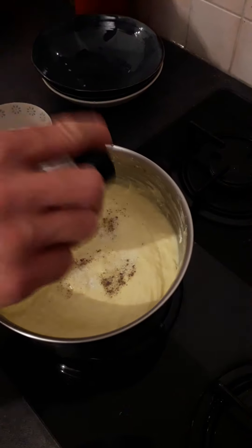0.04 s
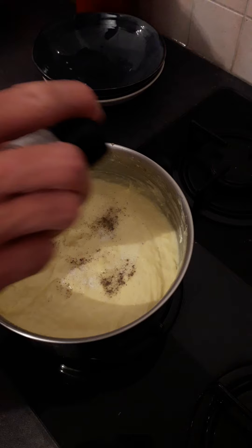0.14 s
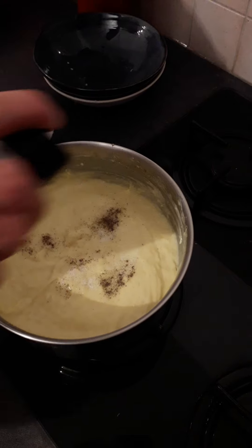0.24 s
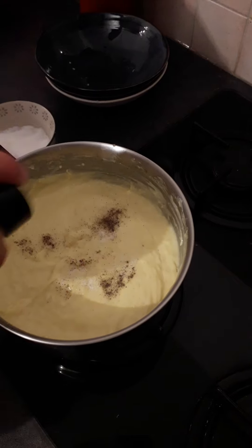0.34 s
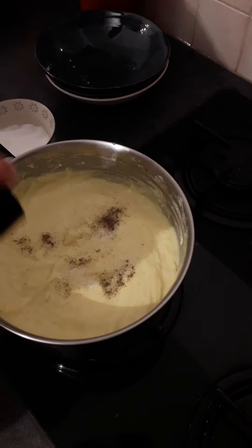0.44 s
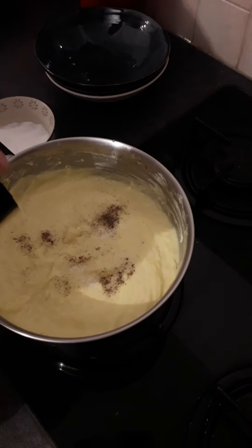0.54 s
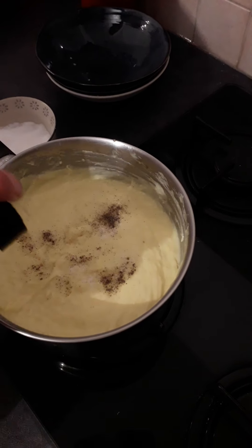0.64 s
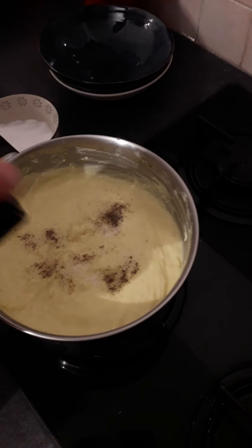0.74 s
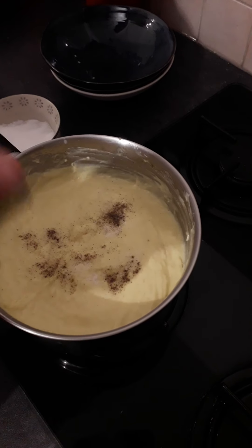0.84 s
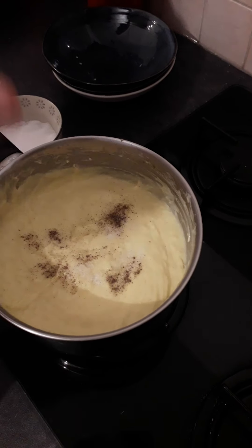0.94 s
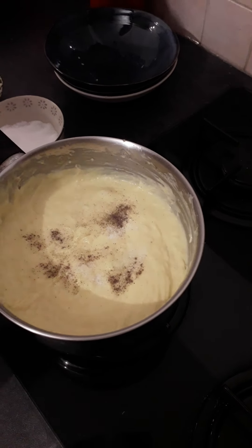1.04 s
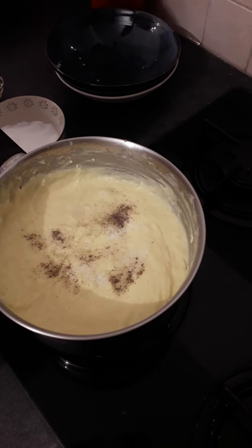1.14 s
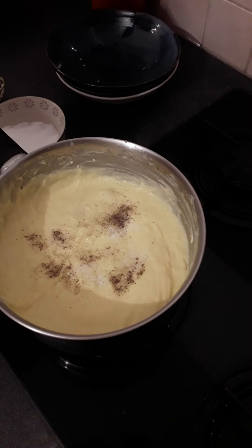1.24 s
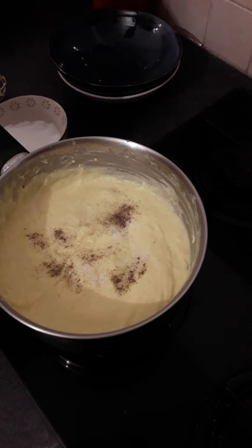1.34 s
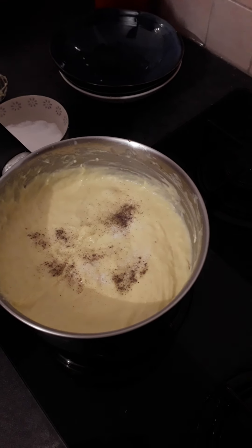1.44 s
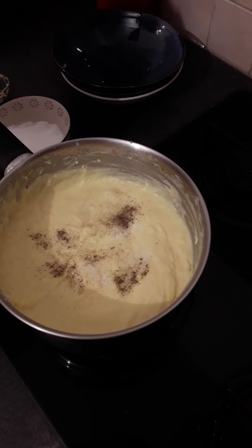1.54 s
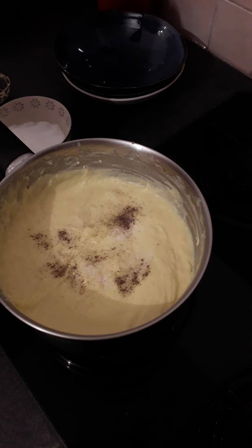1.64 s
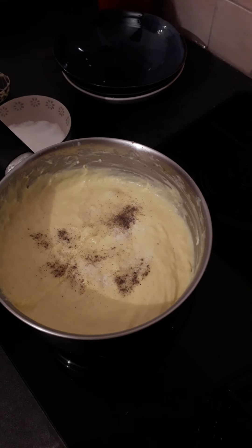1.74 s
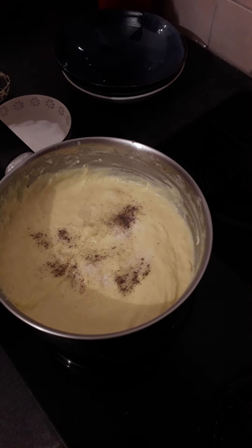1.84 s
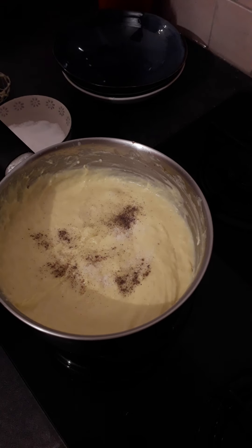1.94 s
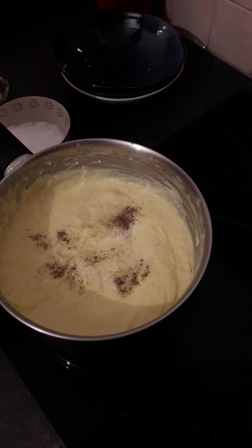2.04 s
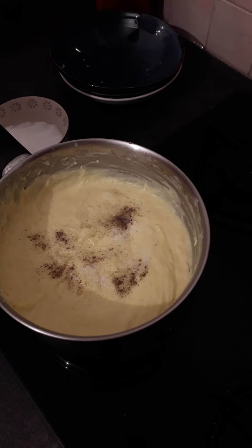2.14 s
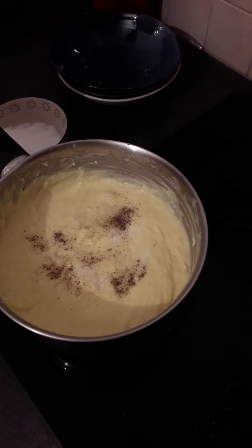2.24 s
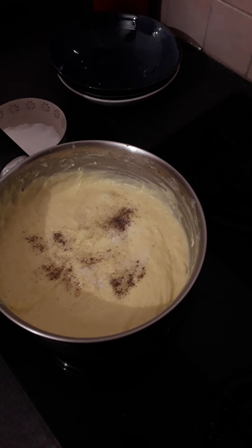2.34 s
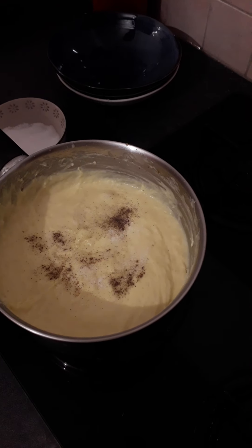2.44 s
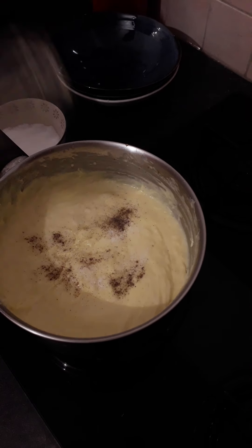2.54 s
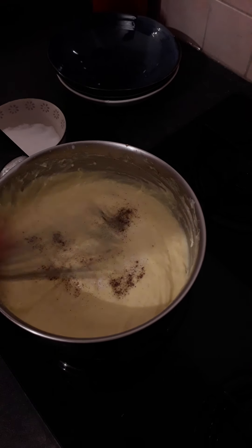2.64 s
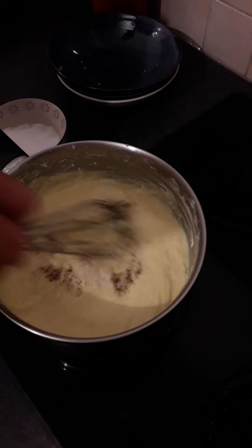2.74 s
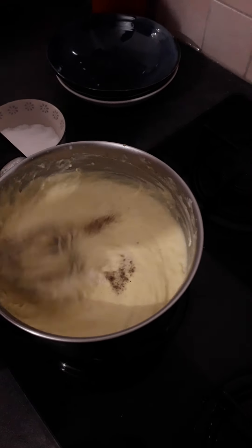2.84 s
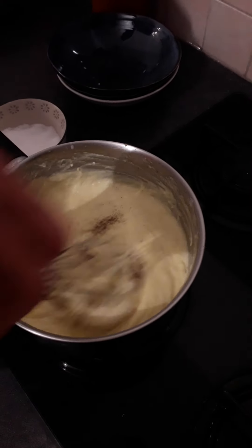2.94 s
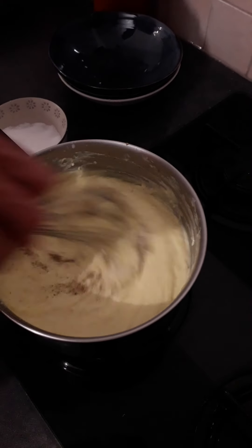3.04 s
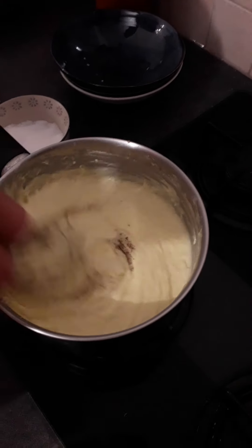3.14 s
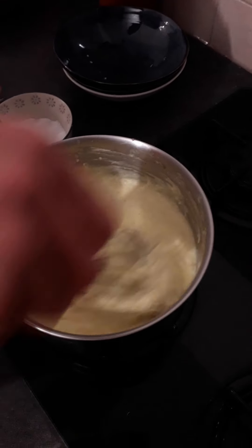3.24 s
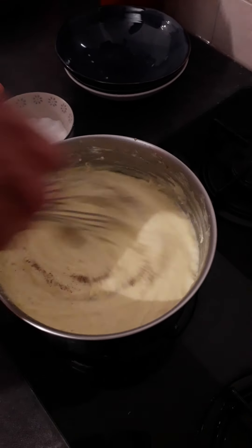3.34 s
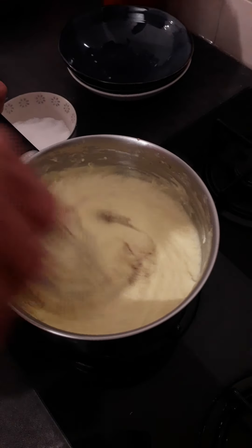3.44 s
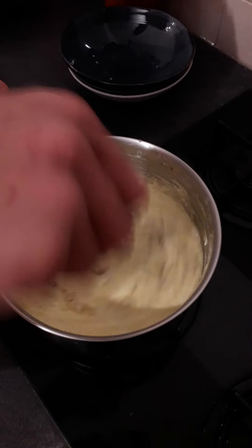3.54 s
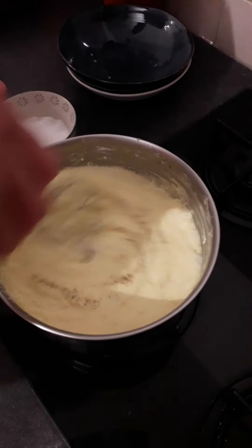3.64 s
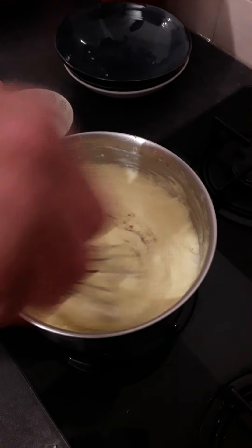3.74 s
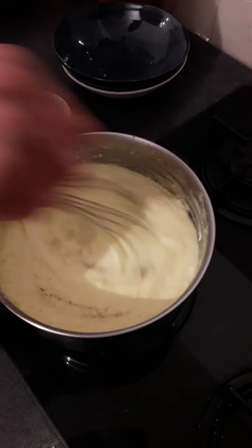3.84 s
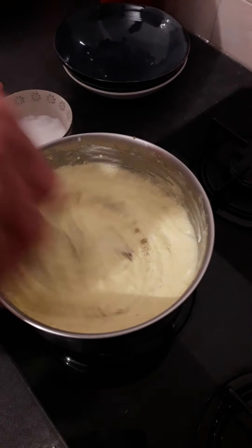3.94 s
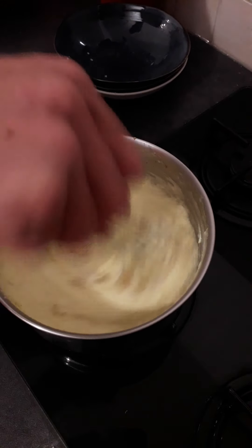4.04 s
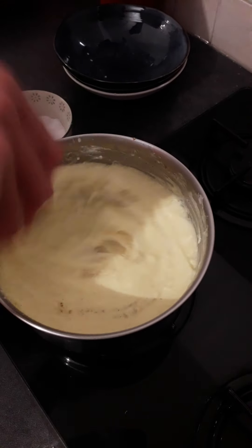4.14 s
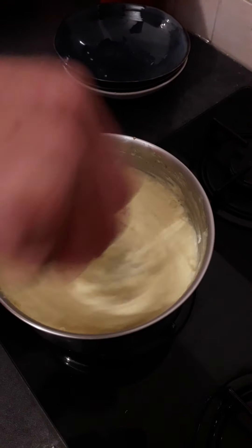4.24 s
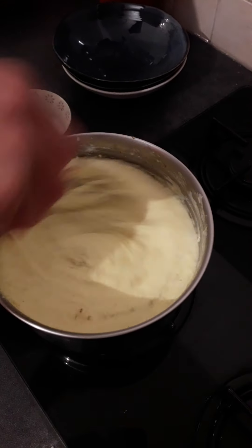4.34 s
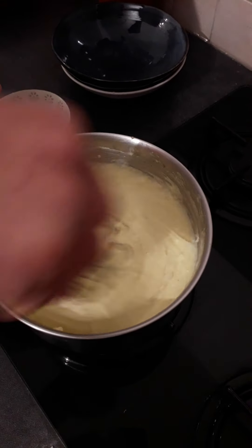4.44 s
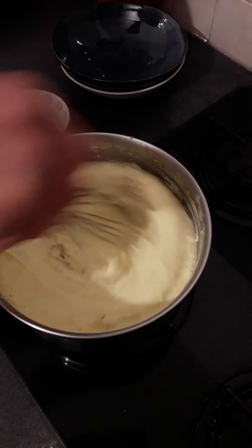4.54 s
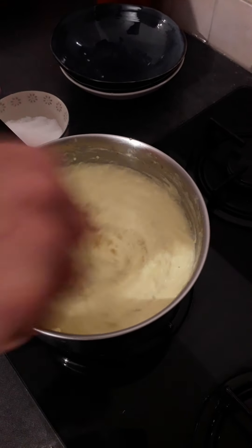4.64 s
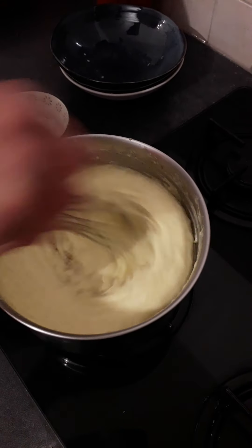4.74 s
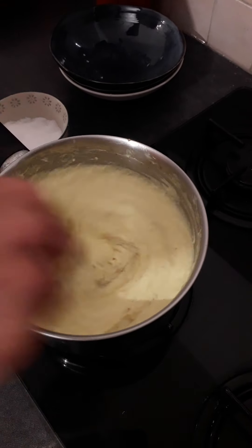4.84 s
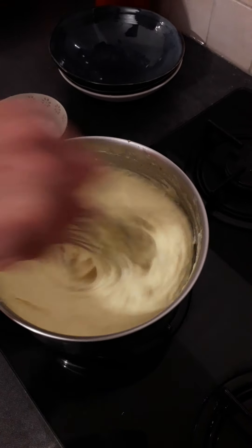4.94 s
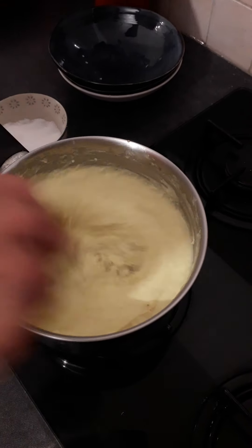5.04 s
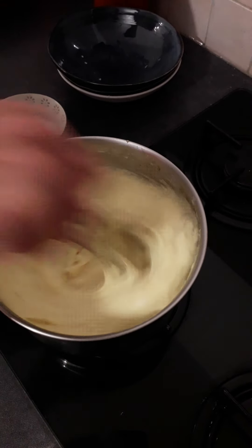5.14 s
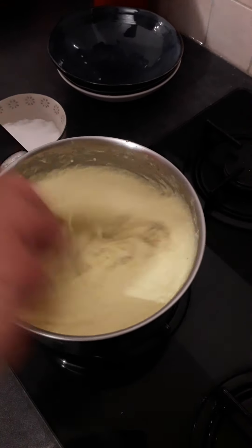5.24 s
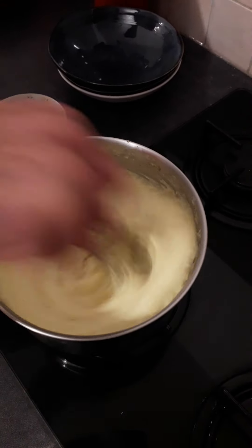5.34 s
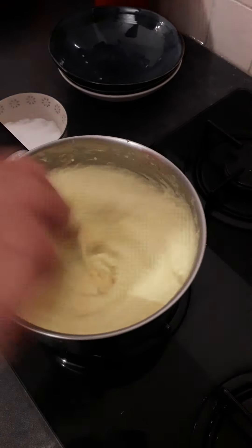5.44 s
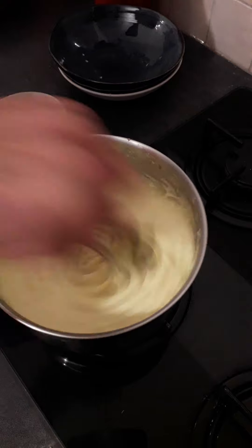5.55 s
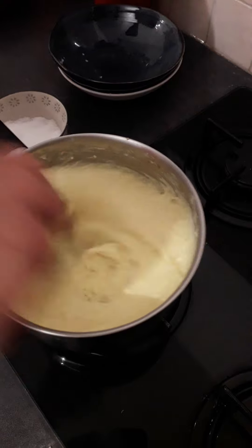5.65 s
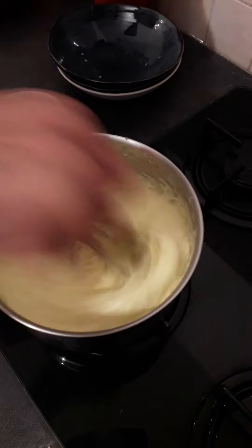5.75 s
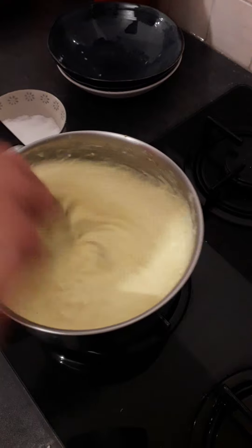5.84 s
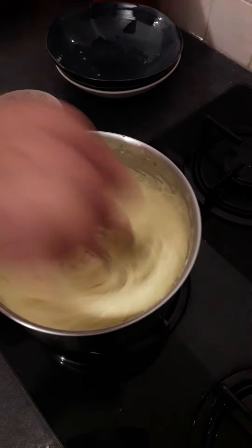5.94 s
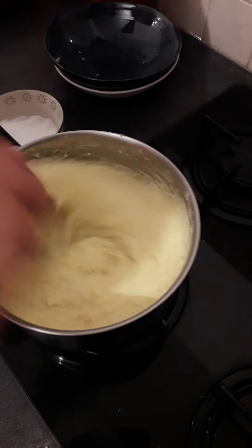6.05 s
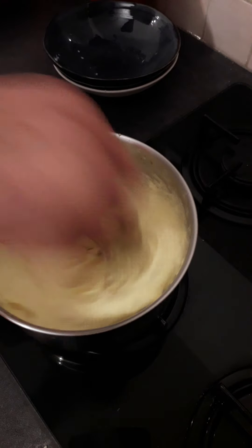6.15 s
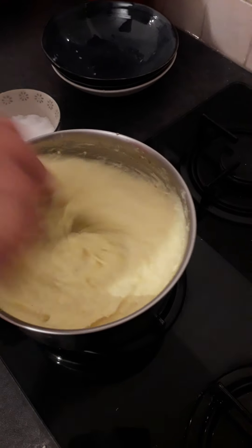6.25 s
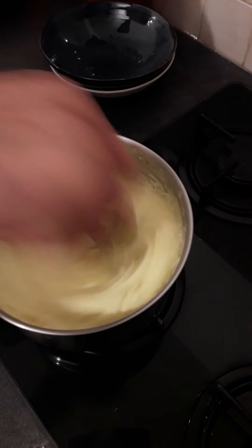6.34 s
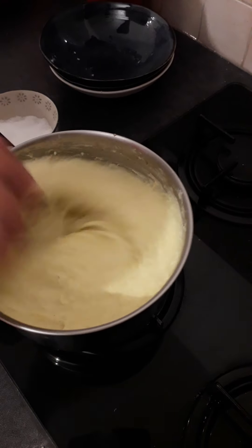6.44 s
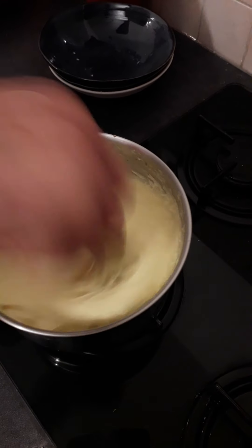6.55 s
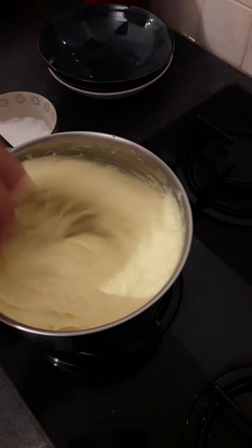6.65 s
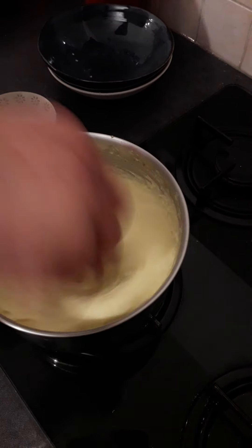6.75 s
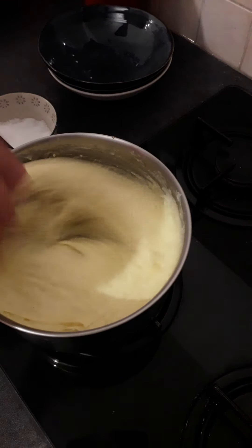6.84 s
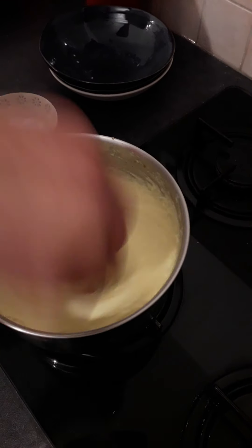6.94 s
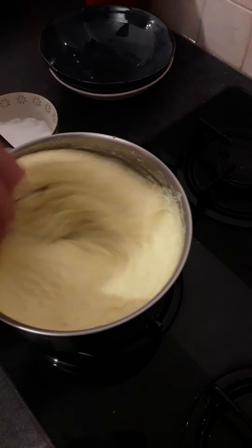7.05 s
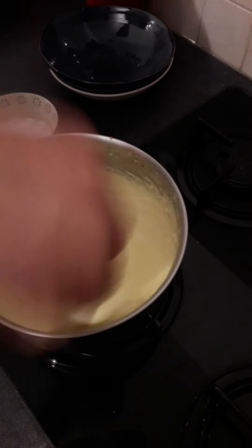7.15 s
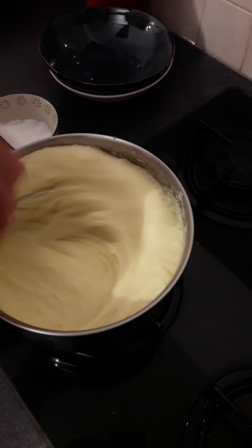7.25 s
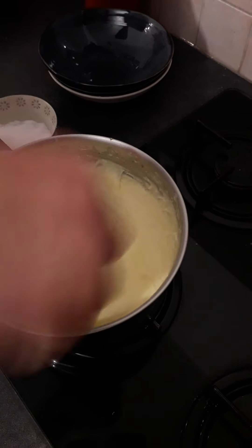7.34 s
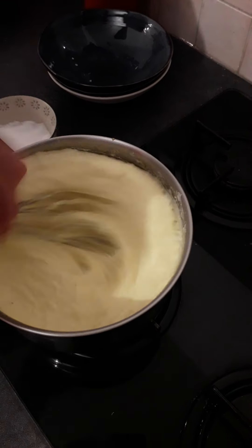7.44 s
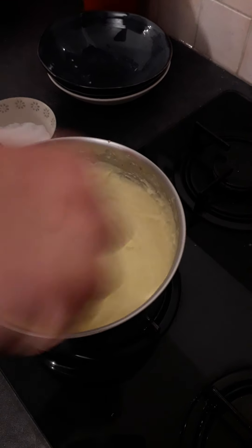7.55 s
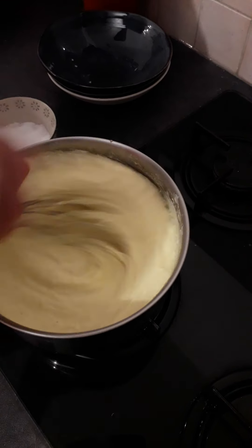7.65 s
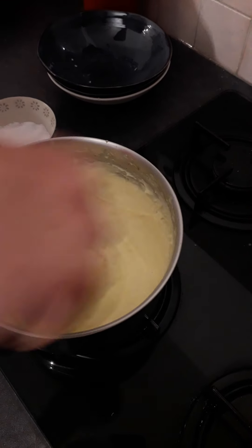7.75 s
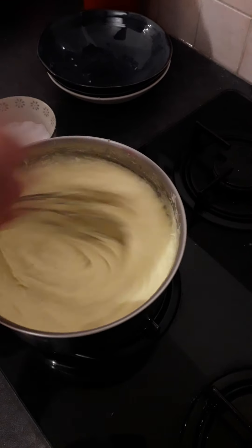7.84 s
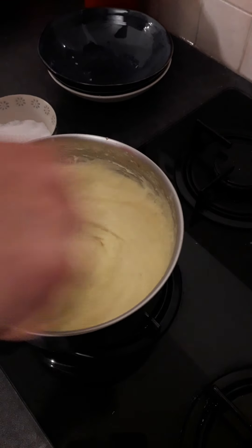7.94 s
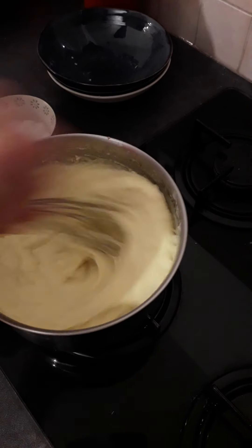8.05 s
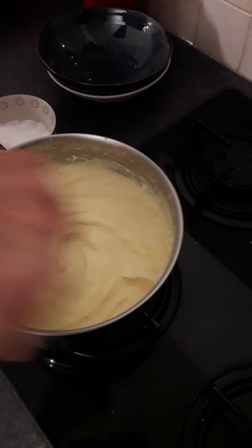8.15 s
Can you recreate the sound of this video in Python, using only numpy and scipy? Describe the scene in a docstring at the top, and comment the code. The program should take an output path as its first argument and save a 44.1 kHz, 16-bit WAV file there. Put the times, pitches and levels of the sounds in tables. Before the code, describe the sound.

After a click and a cupboard bang, a whisk bumps, scrapes and squeaks around a steel pan, churning thick sauce.

```python
"""A faint kitchen hum. Fingers rub and tick on a spice jar, a cupboard catch clicks and the wooden
door bangs shut. A wire whisk sinks into thick sauce, squeaks on a steel saucepan and bumps its floor;
the glass hob booms below. The whisk gathers speed and circles nearly five times a second. Each turn
clacks on the wall and scrapes twice as the wires stick and slip, while the sauce churns in wet pops."""
import sys
import numpy as np
from scipy import signal
from scipy.fft import rfft, irfft
from scipy.io import wavfile
from scipy.ndimage import uniform_filter1d, minimum_filter1d

SR = 44100
rng = np.random.default_rng(int(sys.argv[2]) if len(sys.argv) > 2 else 0)


def unload_wav(signal):
    """Save mono or channel-first audio to the path in sys.argv[1] as 16-bit WAV at rate SR, clipped to [-1, 1]."""
    wavfile.write(
        sys.argv[1],
        SR,
        np.round(np.clip(np.atleast_2d(signal).T, -1, 1) * 32767).astype(np.int16),
    )


N = 361179
TIME_S = np.arange(N) / SR

# Level curves. Each row: time in seconds, relative level in dB.
HUM_NOISE_CURVE = [(0, -66.5), (1.5, -65), (1.8, -64.5), (2.6, -70), (3.2, -61.5), (8.19, -61)]
SWISH_CURVE = [(2.6, -76), (2.728, -67), (2.862, -68.5), (3.532, -69.5), (3.908, -69), (4.392, -71),
               (4.45, -56)]  # wires cutting slowly through the sauce
CHURN_CURVE = [(4.3, -54), (4.6, -46), (4.85, -47.5), (5.25, -42), (5.65, -38.5), (6.25, -44),
               (6.75, -39.5), (7.6, -38.5), (8.19, -35)]  # how hard the sauce is stirred

# Spectra. Each row: frequency in Hz, relative spectral density in dB.
HUM_SPECTRUM = [(25, -10), (50, -4), (75, -11.5), (100, 8), (200, -8.5), (320, -0.5), (430, -3.5),
                (550, -0.5), (750, -10.5), (1200, -19.5), (3000, -23.5), (7000, -18.5), (9000, -31),
                (12000, -24.5), (16000, -26.5)]
FINGER_SPECTRUM = [(710, -48), (1200, -21), (2300, -18.5), (3740, 0), (5530, 0), (7330, -1), (9210, -25),
                   (11300, -14.5), (16000, -23.5)]
CATCH_SPECTRUM = [(60, -34), (200, -13), (900, -9), (1700, -2), (2500, -2.5), (3600, 3.5), (4800, -7.5),
                  (7200, -4), (9000, -21.5), (11500, -11.5), (16000, -26.5)]
DOOR_SPECTRUM = [(30, -50.5), (80, -36.5), (130, -9.5), (300, -3), (450, -7), (650, -0.5), (1250, 3),
                 (1700, -6.5), (2400, -16.5), (3500, -13.5), (5000, -23), (7500, -26), (9500, -42.5),
                 (11800, -36), (15000, -56.5)]
SWISH_SPECTRUM = [(1000, -25), (1700, -20), (2400, -20), (3200, -1), (4200, 2), (5600, -1), (7400, 6.5),
                  (8300, -7.5), (9300, -16), (11500, -3.5), (16000, -18)]
POP_SPECTRUM = [(50, -15.5), (90, 3), (170, 11), (260, 0.5), (400, 4), (560, 4), (800, 0), (1100, -1.5),
                (1800, -3.5), (2600, -11.5), (6000, -50)]
THUD_SPECTRUM = [(40, -35), (100, 7), (250, 1), (450, -11.5), (700, 3.5), (1000, -11), (1700, -5.5),
                 (2300, -19.5), (3500, -15), (8000, -61), (16000, -56)]  # struck pan
PING_SPECTRUM = [(800, -36), (2500, 10), (4000, 9), (5900, 11), (7200, -5), (9000, -19), (12000, -25),
                 (16000, -22)]  # struck wires
HOB_SPECTRUM = [(40, -39.5), (70, -25.5), (100, 5), (170, -11), (240, -10), (400, -3.5), (1000, -19.5),
                (4000, -76)]
CLACK_SPECTRUM = [(600, -17.5), (1300, 0.5), (2000, -4.5), (2700, -16), (3700, -7.5), (5000, -22),
                  (7000, -17), (9000, -34), (16000, -37)]  # wire on the pan wall
SCRAPE_SPECTRUM = [(300, -8), (1000, -23), (2000, -1.5), (2600, -9.5), (3200, -3), (4800, -1.5), (5600, 2),
                   (6200, 0), (7100, -1), (8000, -7.5), (9000, -21.5), (16000, -63)]
FIZZ_SPECTRUM = [(4000, -43), (8000, -0.5), (9000, -7), (10500, 2), (11700, 5), (13000, -6), (16000, -6.5)]  # fine spray above the scrape

# Resonances. Each row: frequency in Hz, relative level in dB, T60 in seconds.
JAR_MODES = [(1500, -4, .03), (2080, -1, .03), (2550, -3, .025), (3100, -3, .02), (3620, -1, .02),
             (4250, -1, .02), (5300, 1, .02)]
CATCH_MODES = [(1870, -3, 0.033), (2090, -3.5, .06), (3560, -0.5, 0.033), (3710, 2, 0.041),
               (4250, -8, 0.044), (6700, -4.5, .03)]
DOOR_MODES = [(178, -21, .5), (332.4, -11, 0.86), (542, -1.5, .36), (670, -4, 0.41), (762, 1, 0.44),
              (937, -9.5, .4), (1050, -9, 0.21), (1134, -0.5, .34), (1240, 0, 0.11), (1335, -5, 0.38),
              (1494, -16, .4)]
SPRING_MODES = [(2870, 2.5, .3), (3460, -2.5, .3), (3860, 0, .3), (11460, -5, .2), (11900, -9.5, .18)]  # spring of the catch
HOB_MODES = [(100, 0, .4), (138, -3, .25), (163, 1, .3), (195, -4, .2), (263, -7, .18)]
PAN_MODES = [(545, 0, .11), (610, -5, .08), (765, -6, .09), (918, -11, .08), (1255, -6, .08),
             (1660, -3, .13), (1900, -7, .08), (2050, -10, .06)]  # damped by the sauce
WIRE_MODES = [(2990, 4.5, 0.036), (4400, -14, 0.037), (5400, 4.5, 0.016)]

# Appliance tones. Each row: frequency in Hz, level in dB.
HUM_TONES = [(49, -77.5), (99, -75.5), (296, -71.5), (544, -68)]
# Fingers on the jar. Each row: start in seconds, length in seconds, relative level in dB,
# offset of the glass ring in dB.
JAR_RUBS = [(0.134, .21, -61.5, -6), (0.826, .045, -56, -21), (1.208, .1, -53.5, -18)]
# Light ticks of the jar. Each row: start in seconds, relative level in dB.
JAR_TICKS = [(0.4714, -45), (0.8766, -40.5), (1.9747, -45)]
# Door hitting its frame, then rebounding. Each row: start in seconds, relative level in dB,
# rattle cutoff in Hz.
DOOR_BLOWS = [(1.617, 0, 18000), (1.832, -16, 3000)]
# Wire squeaks. Each row: centre in seconds, width in seconds, pitch in Hz, relative level in dB.
WIRE_SQUEAKS = [(3.014, .071, 1946, -60), (3.028, .06, 546, -49.5), (5.308, .053, 5400, -28.5),
                (5.486, .04, 7050, -32), (5.522, 0.036, 534, -26.5), (5.634, .055, 1912, -28.5),
                (5.727, .053, 542.6, -36), (5.945, 0.083, 544, -32), (6.02, .076, 1950, -34),
                (6.388, .02, 5330, -24), (6.54, .035, 589, -38), (6.738, .025, 5560, -25),
                (7.081, .09, 1900, -38), (7.44, .04, 513, -34), (7.49, 0.031, 1904, -27.5),
                (7.664, 0.055, 2050, -33.5)]
# Whisk on the pan floor. Each row: start in seconds, relative level in dB, hob offset in dB,
# wire offset in dB.
FLOOR_BUMPS = [(3.26, -25, -9, -17), (3.474, -36.5, -4, -47), (3.746, -38.5, -3, -52),
               (3.981, -38, -2, -45), (4.112, -25, -15, -17), (4.352, -18.5, -26, -12),
               (4.583, -19.5, -14.5, -6.5), (4.788, -18.5, -14.5, -8), (4.864, -21.5, -10, -10),
               (4.992, -22, -14, -12), (5.55, -32.5, -23, 0), (6.497, -19, -12.5, -7.5),
               (6.827, -32.5, -8, -7), (7.939, -24, -37, -4.5)]
# Whisk turns. Each row: start in seconds, relative clack level in dB, hob offset in dB,
# push delay in seconds, relative push level in dB, relative back-sweep level in dB.
WHISK_TURNS = [(4.305, -37, 1, 0.072, -65, -47), (4.533, -29, -8, 0.08, -39.5, -49),
               (4.731, -28.5, -12, 0.04, -38, -34.5), (4.935, -28, -14, 0.059, -31.5, -32.5),
               (5.12, -20, -17.5, 0.067, -28.5, -32.5), (5.317, -21, -15.5, 0.078, -28, -34.5),
               (5.5198, -28, -21, .077, -27.5, -34.5), (5.731, -46, 1, 0.073, -28.5, -34),
               (5.9488, -21.5, -22, 0.053, -28, -31), (6.1588, -23.5, -10.5, 0.05, -29.5, -32),
               (6.354, -21.5, -9, 0.059, -28.5, -29.5), (6.56, -21.5, -9, 0.056, -27, -31),
               (6.7679, -20.5, -22, 0.053, -26, -32), (6.983, -23, -16, 0.051, -27, -32),
               (7.2005, -21.5, -9, 0.047, -31.5, -31.5), (7.3911, -23.5, -9, 0.055, -27, -32.5),
               (7.6011, -30, -20, 0.054, -28, -30.5), (7.8186, -24, -17, 0.05, -30, -31),
               (8.017, -26, -29, 0.058, -26.5, -30)]
# Singing wires. Each row: pitch in Hz, scatter in Hz.
WIRE_PITCHES = [(4600, 277), (5400, 113), (5600, 124), (5750, 413), (6400, 297), (7100, 173)]
FIZZ_PITCHES = [(10700, 3300), (11700, 1500), (13500, 1000)]
# Kitchen reverberation. Each row: frequency in Hz, T60 in seconds.
ROOM_DECAY = [(100, .7), (300, 0.72), (1000, 0.54), (2000, 0.48), (5000, 0.47), (8000, 0.32), (13000, 0.38)]


def amp(db):
    """Decibels to gain."""
    return 10 ** (np.asarray(db) / 20)


def unit(x):
    """Scale to rms 1."""
    return x / np.sqrt(np.mean(x ** 2) + 1e-20)


def lookup(rows, hz):
    """Interpolate a table over log frequency."""
    row_hz, value = np.transpose(rows)
    return np.interp(np.log(hz + 1), np.log(row_hz + 1), value)


def envelope(curve):
    """Level curve as gain, silent outside its span."""
    time_s, db = np.transpose(curve)
    return amp(np.interp(TIME_S, time_s, db, left=-200, right=-200))


def add(mix, start_s, sound):
    """Mix a sound in place."""
    part = mix[max(round(start_s * SR), 0):][:len(sound)]
    part += sound[:len(part)]


def through(x, response):
    """Convolve with the response scaled to energy 1; keep the input length."""
    return signal.oaconvolve(x, response / np.linalg.norm(response))[:len(x)]


def colour(x, spectrum, size=4096):
    """Minimum-phase filter with the shape of the spectrum."""
    log_gain = np.log(amp(lookup(spectrum, abs(np.fft.fftfreq(size, 1 / SR)))))
    response = np.fft.ifft(np.exp(np.conj(signal.hilbert(log_gain)))).real
    return through(x, response[:size // 2])


def ring(x, modes):
    """Drive damped modes; little radiates below the lowest."""
    t = TIME_S[:SR]
    response = sum(amp(db - 60 * t / t60_s) * np.sin(2 * np.pi * hz * t) * rng.choice([-1, 1])
                   for hz, db, t60_s in modes)
    highpass = signal.butter(2, modes[0][0] / 2, "high", fs=SR, output="sos")
    return through(x, signal.sosfilt(highpass, response))


def chatter(t60_s, size=16384):
    """A contact breaks into a dying burst of small impacts; flat spectrum, energy 1."""
    t = TIME_S[:size]
    burst = rng.standard_normal(size) * amp(-60 * t / t60_s)
    for _ in range(2):
        bins = rfft(burst)
        burst = irfft(bins / (abs(bins) + 1e-9)) * np.exp(-(t / t60_s) ** 2)
    return burst / np.linalg.norm(burst)


def drift(per_s):
    """Random wander, rms 1."""
    knots = rng.standard_normal(N // 64)
    return unit(np.interp(TIME_S * per_s, np.arange(len(knots)), knots))


def grit(per_s, spread_db):
    """Random tiny impacts of uneven size, rms 1."""
    size = amp(spread_db * np.minimum(rng.exponential(1, N), 4))
    return unit(size * rng.choice([-1, 1], N) * (rng.random(N) < per_s / SR))


def room(x, wet_db, echoes_per_s=4000):
    """Add dense kitchen reflections, each band dying at its own rate."""
    echoes = rng.standard_normal(SR) * (rng.random(SR) < echoes_per_s / SR)
    hz, t, bands = signal.stft(echoes, SR, nperseg=256)
    decay = amp(-60 * t / lookup(ROOM_DECAY, hz)[:, None])
    tail = signal.istft(bands * decay, SR, nperseg=256)[1][:SR]
    tail *= np.clip((TIME_S[:SR] - .003) / .0051, 0, 1)
    return x + amp(wet_db) * through(x, tail)


def hum():
    """A faint appliance: soft noise and wavering tones."""
    noise = envelope(HUM_NOISE_CURVE) * colour(rng.standard_normal(N), HUM_SPECTRUM)
    return noise + sum(amp(db) * np.sin(2 * np.pi * hz * TIME_S + .76 * drift(per_s=2.6))
                       for hz, db in HUM_TONES)


def spice_jar(attack_s=.015, release_s=.04):
    """Fingers rasp over the jar and ring the glass; a few light ticks."""
    pressure = amp(-84) * (TIME_S < DOOR_BLOWS[0][0])  # hand rustle between rubs
    on_glass, ticks = np.zeros((2, N))
    t = TIME_S[:SR]
    for start_s, length_s, db, ring_db in JAR_RUBS:
        press = amp(db) * np.minimum(t / attack_s, 1) * np.exp(-np.maximum(t - length_s, 0) / release_s)
        add(pressure, start_s, press)
        add(on_glass, start_s, amp(ring_db) * press)
    rasp = grit(per_s=1700, spread_db=-.5)
    rub = amp(-4.5) * colour(rasp * pressure, FINGER_SPECTRUM) + ring(rasp * on_glass, JAR_MODES)
    for start_s, db in JAR_TICKS:
        add(ticks, start_s, amp(db) * chatter(t60_s=.029))
    ticks = signal.sosfilt(signal.butter(4, [3900, 6200], "band", fs=SR, output="sos"), ticks)
    return room(rub, wet_db=-11.5) + room(amp(23.5) * ticks, wet_db=-10)


def cupboard(catch_s=1.4185):
    """The catch clicks; the door bangs and rattles in its frame, ringing the catch spring."""
    catch, rattle, strike = np.zeros((3, N))
    add(catch, catch_s, chatter(t60_s=.036))
    for start_s, db, cutoff_hz in DOOR_BLOWS:
        lowpass = signal.butter(1, cutoff_hz, fs=SR)
        add(rattle, start_s, amp(db) * signal.lfilter(*lowpass, chatter(t60_s=.21)))
        add(strike, start_s, amp([db]))
    click = amp(5.5) * colour(catch, CATCH_SPECTRUM) + amp(-4) * ring(catch, CATCH_MODES)
    panel = amp(18.5) * ring(strike, DOOR_MODES)
    spring = amp(1.5) * ring(strike ** 2, SPRING_MODES)  # only a hard blow shakes it
    bang = amp(19.5) * colour(rattle, DOOR_SPECTRUM)
    return room(click, wet_db=0) + room(bang, wet_db=-3) + panel + spring


def churning(gulp_s=3.03, gulp_width_s=.045, surge_db=4, slop_db=-15.5, settle_s=.057):
    """Sauce motion: a gulp as the whisk sinks, a slop per bump, stirring that surges each turn."""
    surge, slop = np.zeros((2, N))
    settle = np.exp(-TIME_S[:SR] / settle_s)
    for start_s, *_ in WHISK_TURNS:
        add(surge, start_s, settle)
    for start_s, db, *_ in FLOOR_BUMPS:
        add(slop, start_s, amp(db + slop_db) * settle)
    gulp = amp(-64) * np.exp(-((TIME_S - gulp_s) / gulp_width_s) ** 2)
    return gulp + np.hypot(envelope(CHURN_CURVE) * amp(surge_db * surge), slop)


def sauce():
    """Wires swish through thick sauce; churning makes wet pops and shakes the pan on the hob."""
    churn = churning()
    pops = colour(grit(per_s=900, spread_db=4) * churn, POP_SPECTRUM)
    tremble = ring(grit(per_s=400, spread_db=1) * churn, HOB_MODES)
    cutting = grit(per_s=2000, spread_db=3.5) * envelope(SWISH_CURVE)
    flicker = unit(amp(4 * np.clip(drift(per_s=60), -2, 2)))
    swish = colour(cutting * flicker, SWISH_SPECTRUM)
    return amp(-2.5) * pops + amp(-19) * tremble + amp(-1.5) * swish


def squeaks(waver_depth=.028, bite_db=5.5):
    """A wire sticks and slips; the pan sings in short, broken tones."""
    out = np.zeros(N)
    waver = waver_depth * drift(per_s=330)
    bite = unit(amp(bite_db * np.clip(drift(per_s=190), -2, 1.5)))
    for centre_s, width_s, hz, db in WIRE_SQUEAKS:
        near = abs(TIME_S - centre_s) < width_s
        swell = np.exp(-(2 * (TIME_S[near] - centre_s) / width_s) ** 2)
        phase = 2 * np.pi * np.cumsum(hz * (1 + waver[near])) / SR
        out[near] += amp(db) * swell * np.sin(phase)
    return out * bite


def bumps(floor_hz=480, damped_s=.011):
    """The whisk hits the pan floor: a hollow thud and a wire ping; pan and hob ring on."""
    thud, boom, ping, hollow = np.zeros((4, N))
    t = TIME_S[:int(damped_s * SR)]
    floor_tone = np.sin(2 * np.pi * floor_hz * t) * (1 - t / t[-1])  # damped by the sauce
    for start_s, db, hob_db, wire_db in FLOOR_BUMPS:
        add(thud, start_s + .001096, amp(db) * chatter(t60_s=.029))
        add(boom, start_s + .0025, amp(db + hob_db) * chatter(t60_s=.052))
        add(ping, start_s + .001, amp(db + wire_db) * chatter(t60_s=.015))
        add(hollow, start_s, amp(db) * floor_tone)
    wires = amp(23.5) * colour(ping, PING_SPECTRUM) + amp(16.5) * ring(ping, WIRE_MODES)
    pan = amp(14.5) * colour(thud, THUD_SPECTRUM) + amp(11.5) * ring(thud, PAN_MODES)
    return amp(-9) * hollow + pan + amp(29) * hob(boom) + wires


def hob(blows):
    """The glass top under the pan booms and rings low."""
    return colour(blows, HOB_SPECTRUM) + amp(-1.5) * ring(blows, HOB_MODES)


def clacks():
    """The sauce-damped wall answers each blow with a few falling cycles; pan and hob ring on."""
    blows, boom, wall = np.zeros((3, N))
    chirps = rng.uniform([.0042, 1800, 1400], [.0056, 2000, 1550], (len(WHISK_TURNS), 3))
    for (start_s, db, hob_db, *_), (length_s, top_hz, end_hz) in zip(WHISK_TURNS, chirps):
        phase = 2 * np.pi * np.cumsum(np.linspace(top_hz, end_hz, int(length_s * SR))) / SR
        add(wall, start_s + .0007, amp(db) * signal.windows.tukey(len(phase), .5) * np.sin(phase))
        add(blows, start_s + .001256, amp(db) * chatter(t60_s=.039))
        add(boom, start_s + .0033, amp(db + hob_db) * chatter(t60_s=.045))
    rattle = amp(7) * colour(blows, THUD_SPECTRUM) + amp(19.5) * colour(blows, CLACK_SPECTRUM)
    return amp(-.5) * wall + rattle + amp(10.5) * ring(blows, PAN_MODES) + amp(25) * hob(boom)


def strokes(push_width_s=.08, back_width_s=.068, back_lag_turns=.49):
    """Scrape and fizz envelopes: a push across the floor and a sweep back in each turn."""
    rub_power, fizz_power = np.zeros((2, N))
    periods_s = np.diff([turn[0] for turn in WHISK_TURNS])
    periods_s = np.append(periods_s, periods_s.max())
    for (start_s, _, _, delay_s, push_db, back_db), period_s in zip(WHISK_TURNS, periods_s):
        push = (start_s + delay_s, push_width_s, push_db, -16.5)
        back = (start_s + delay_s + back_lag_turns * period_s, back_width_s, back_db, -15)
        for centre_s, width_s, db, fizz_db in (push, back):
            swell = np.exp(-abs(np.linspace(-2, 2, int(2 * width_s * SR))) ** 3)
            add(rub_power, centre_s - width_s, (amp(db) * swell) ** 2)
            add(fizz_power, centre_s - width_s, (amp(db + fizz_db) * swell) ** 2)
    return np.sqrt(rub_power), np.sqrt(fizz_power)


def wire_pings(pitches, per_s, spread_db):
    """Single wires sing briefly, each with its own pitch, length and size; rms 1."""
    out = np.zeros(N)
    count = int(per_s * N / SR)
    for (when, which, length, size), stray in zip(rng.random((count, 4)), rng.standard_normal(count)):
        hz, scatter_hz = pitches[int(which * len(pitches))]
        t = TIME_S[:int(SR * (.005 + .018 * length))]
        tone = np.sin(2 * np.pi * (hz + scatter_hz * stray) * t)
        add(out, when * N / SR, amp(spread_db * size) * np.hanning(len(t)) * tone)
    return unit(out)


def scrape():
    """Wires catch on the steel in tiny slips, hissing and singing; the pan rings under them."""
    rub, fizz = strokes()
    slips = unit(grit(per_s=6400, spread_db=3) * amp(1.9 * drift(per_s=170)))
    pressure = rub / amp(-28)
    hiss = colour(slips * pressure ** .89, SCRAPE_SPECTRUM)
    singing = .75 * pressure ** .85 * wire_pings(WIRE_PITCHES, per_s=240, spread_db=20)
    spray = colour(slips * fizz, FIZZ_SPECTRUM)
    spray += .6 * fizz * wire_pings(FIZZ_PITCHES, per_s=500, spread_db=14)
    return amp(-31) * (hiss + singing) + amp(2.44) * spray + amp(-19.5) * ring(slips * rub, PAN_MODES)


def scene():
    """All sources in one kitchen, mono."""
    stirring = room(scrape(), wet_db=-7) + room(squeaks(), wet_db=-9) + room(sauce(), wet_db=-4)
    blows = room(bumps(), wet_db=-5.5) + room(clacks(), wet_db=-7) + cupboard()
    highpass = signal.butter(5, 74, "high", fs=SR, output="sos")  # small objects radiate little bass
    return (signal.sosfilt(highpass, stirring + blows) + spice_jar() + hum())[None]


def record(dry):
    """Peak limiter, then low-pass."""
    ceiling, window_samples, cutoff_hz = .98, 400, 15900
    gain = ceiling / np.maximum(abs(dry), ceiling)
    gain = uniform_filter1d(minimum_filter1d(gain, window_samples), window_samples)
    lowpass = signal.firwin(511, cutoff_hz, window=("kaiser", 9), fs=SR)
    return signal.oaconvolve(dry * gain, lowpass[None], "same")


dry = scene()
out = record(dry)
unload_wav(out)
```